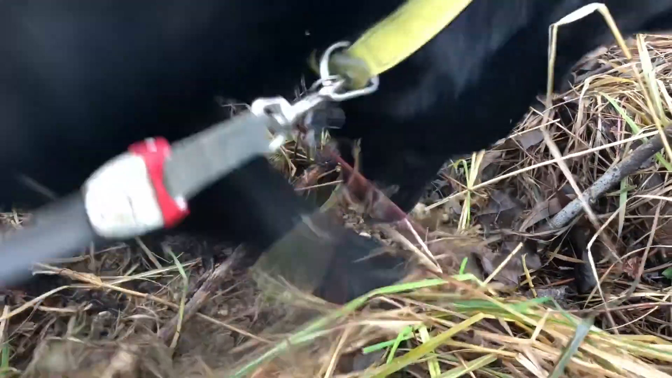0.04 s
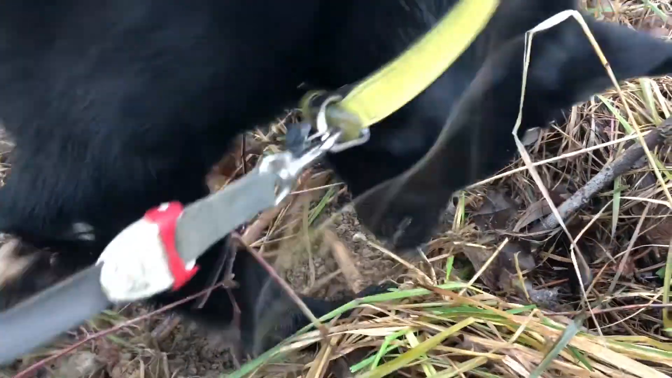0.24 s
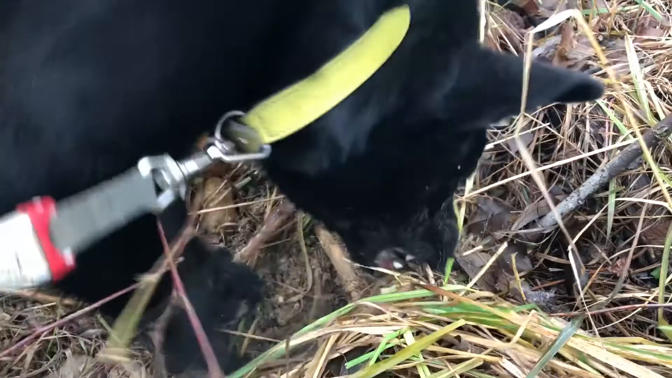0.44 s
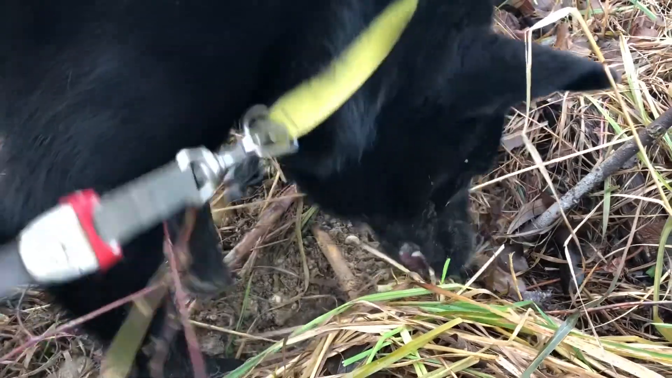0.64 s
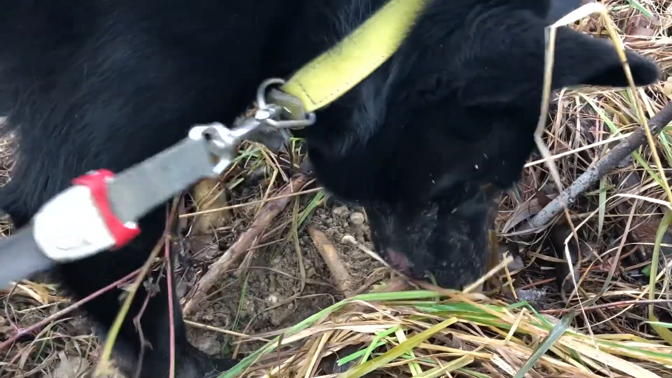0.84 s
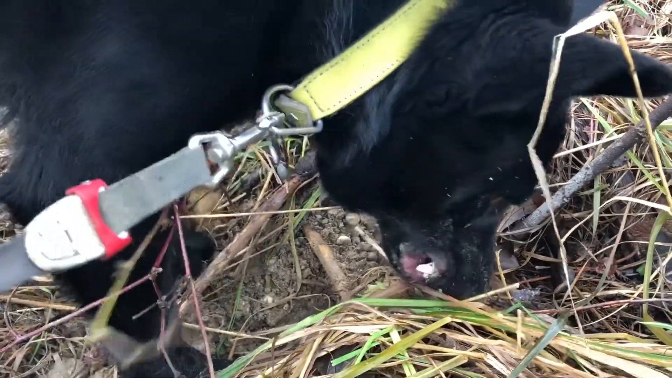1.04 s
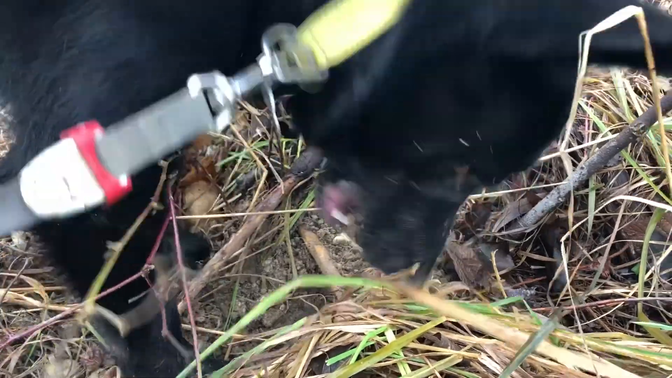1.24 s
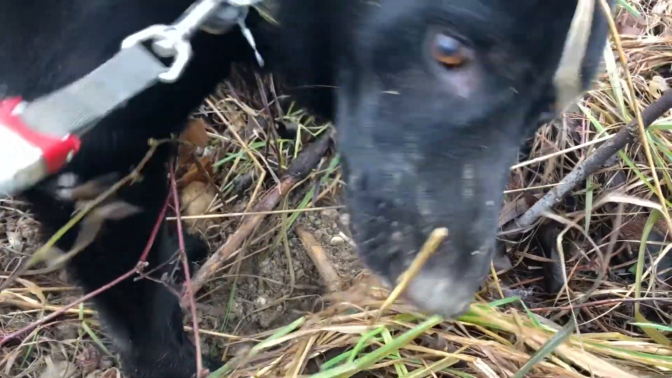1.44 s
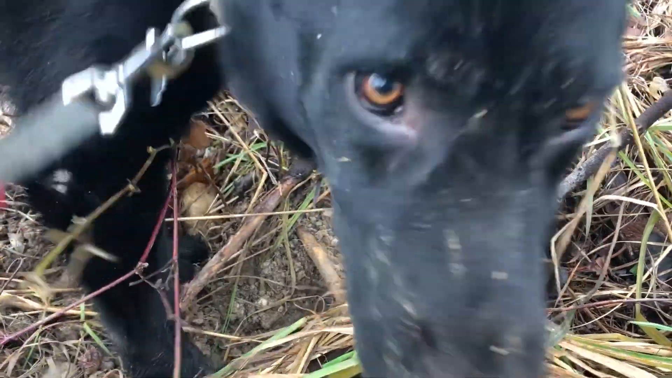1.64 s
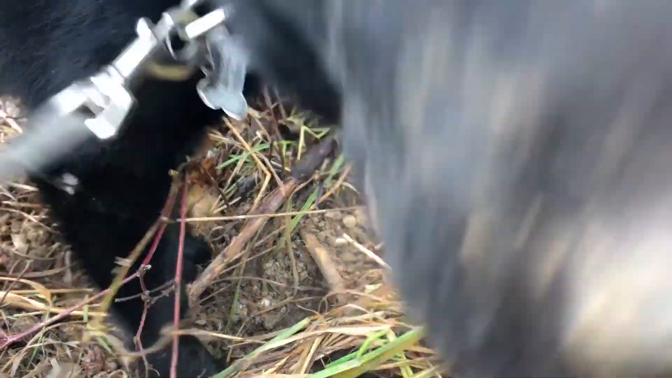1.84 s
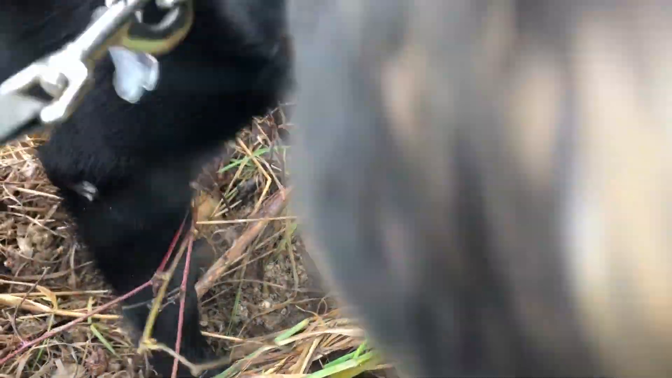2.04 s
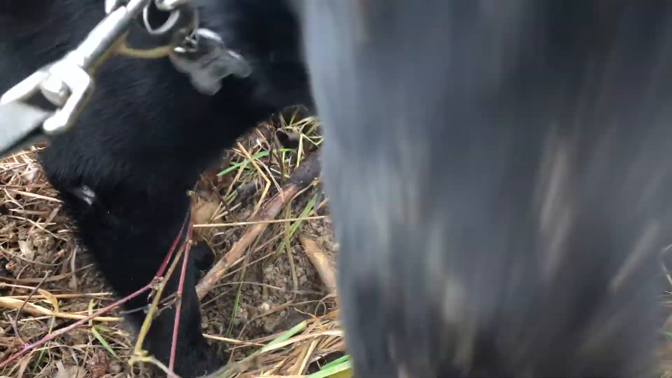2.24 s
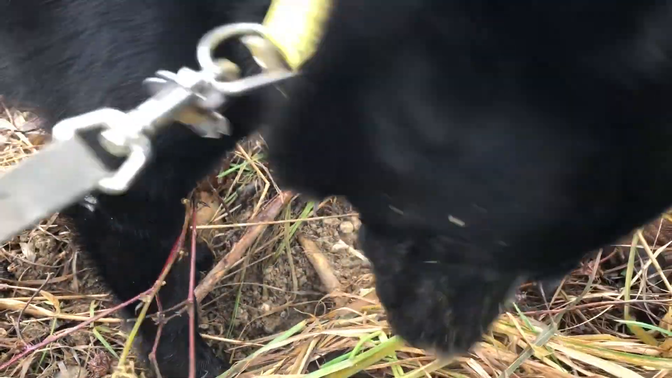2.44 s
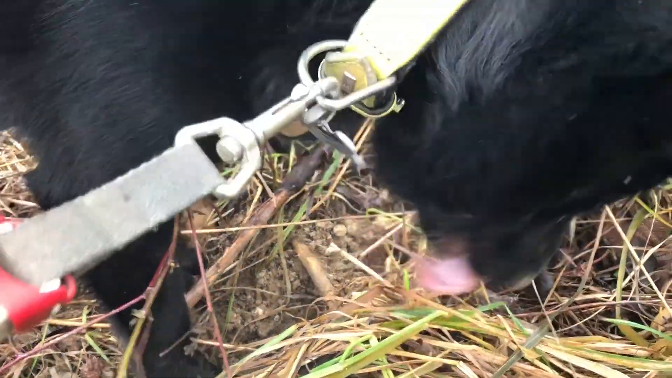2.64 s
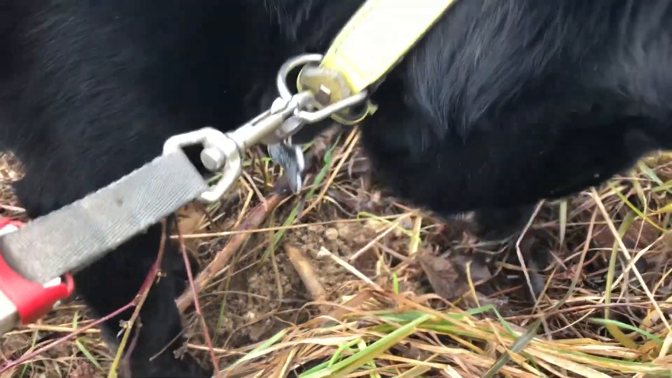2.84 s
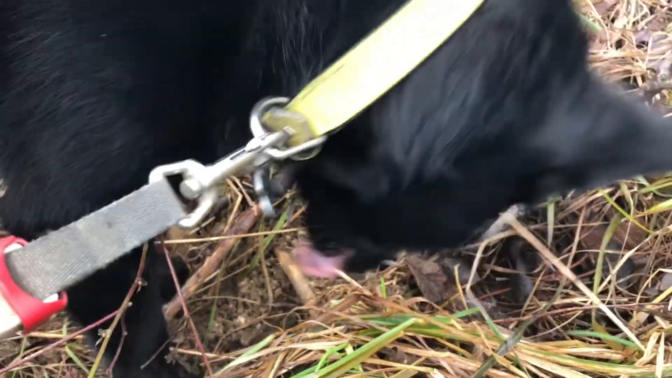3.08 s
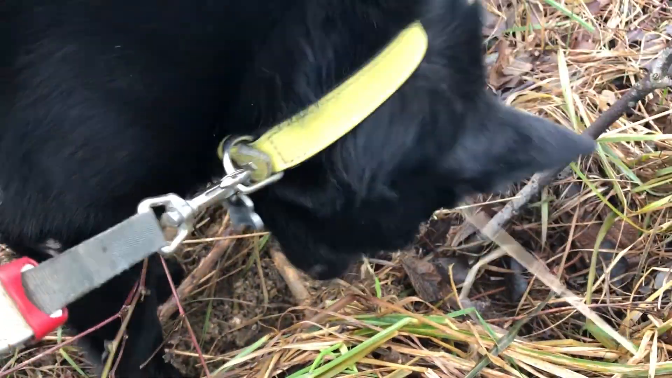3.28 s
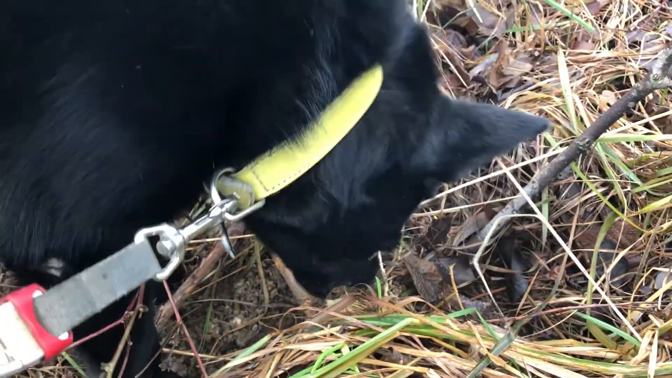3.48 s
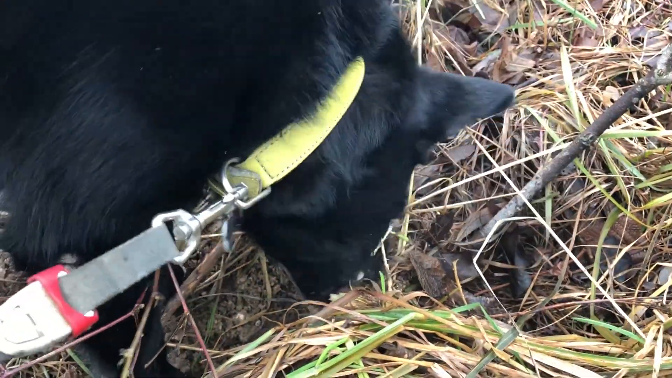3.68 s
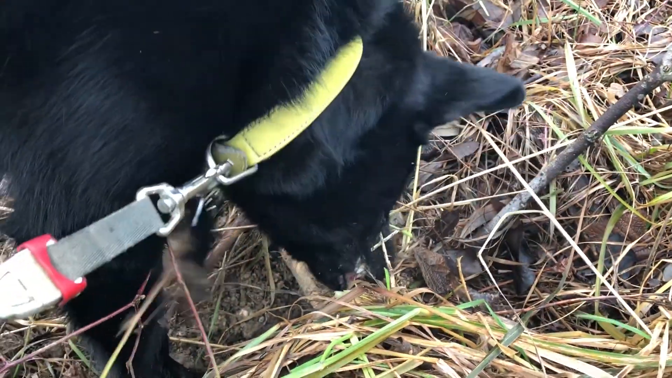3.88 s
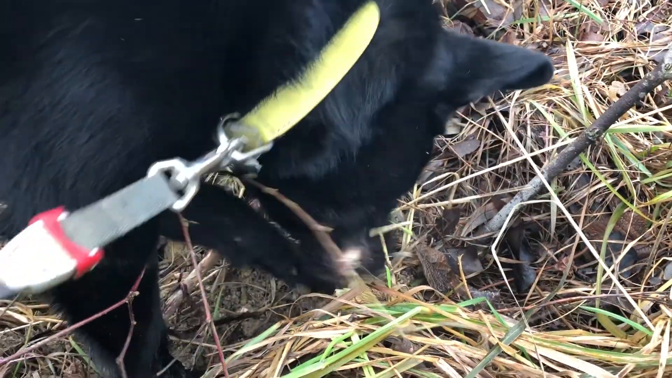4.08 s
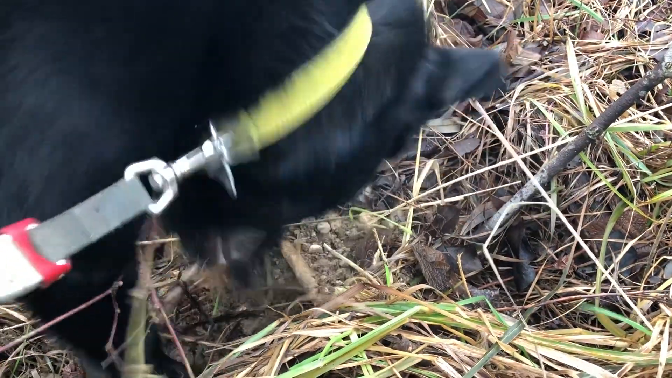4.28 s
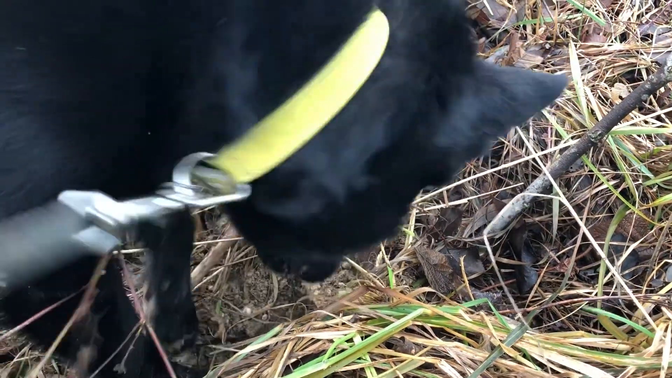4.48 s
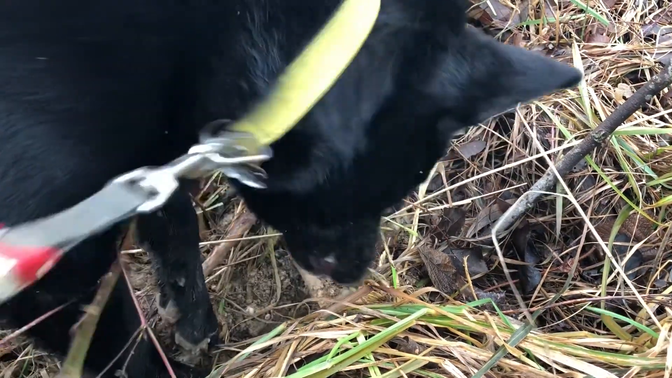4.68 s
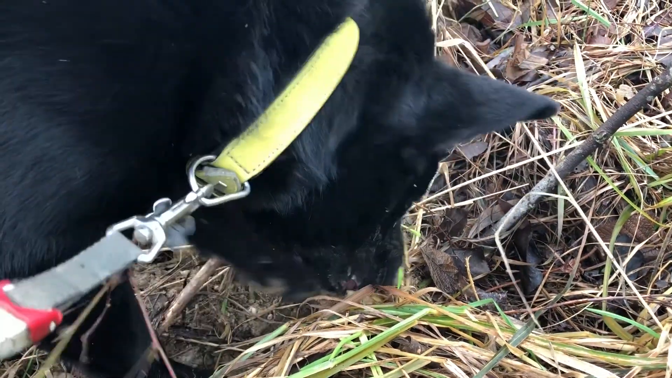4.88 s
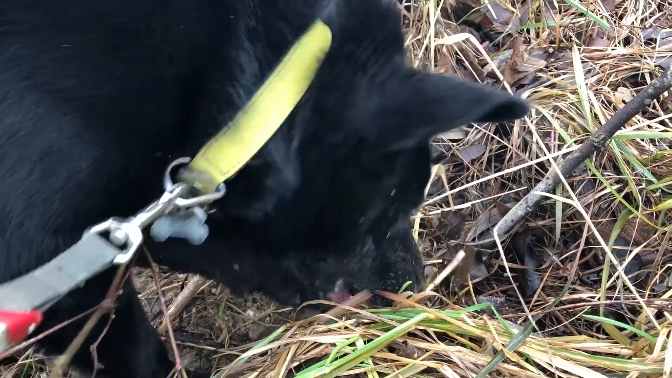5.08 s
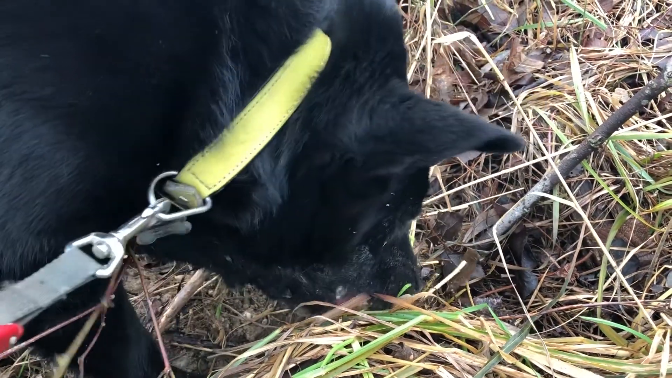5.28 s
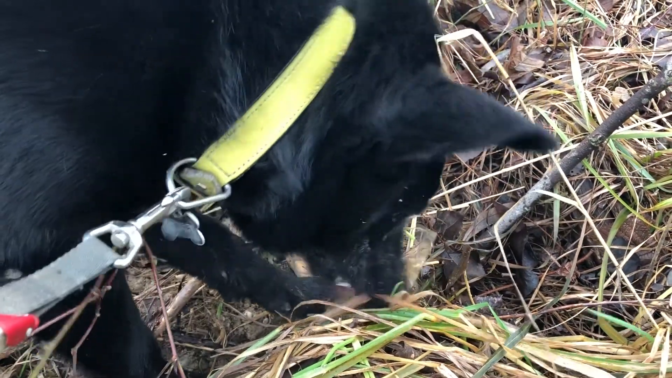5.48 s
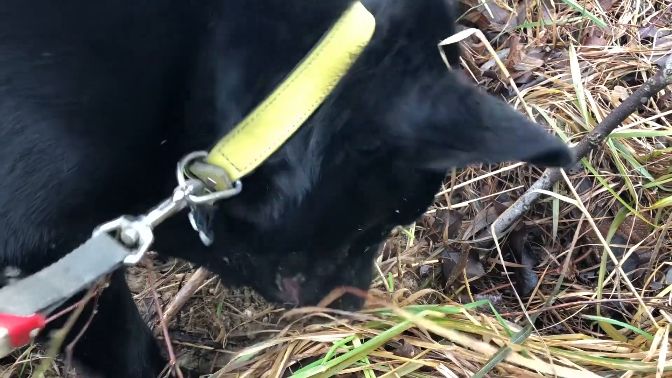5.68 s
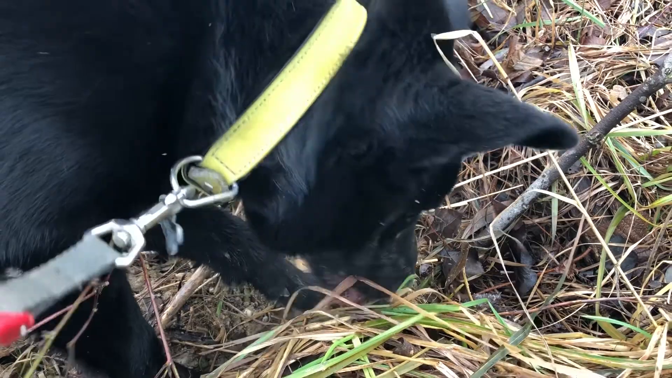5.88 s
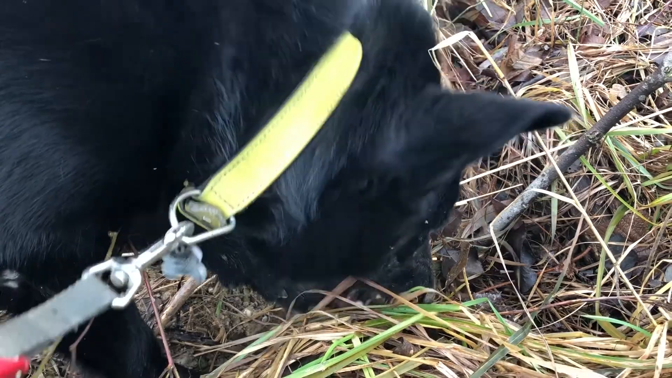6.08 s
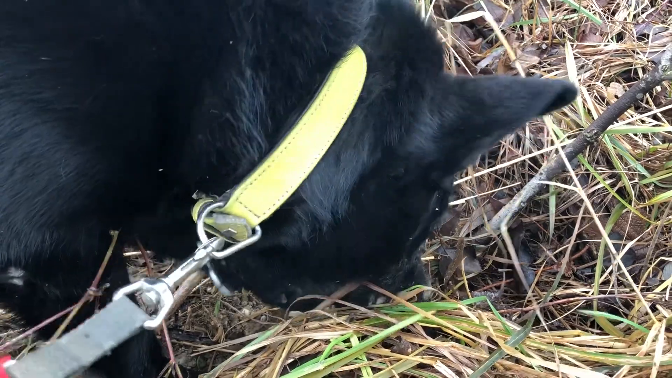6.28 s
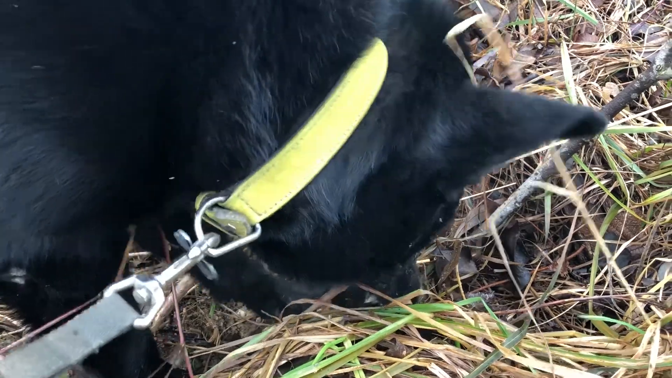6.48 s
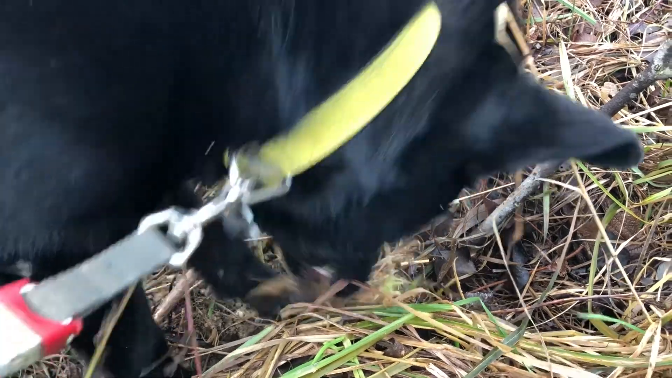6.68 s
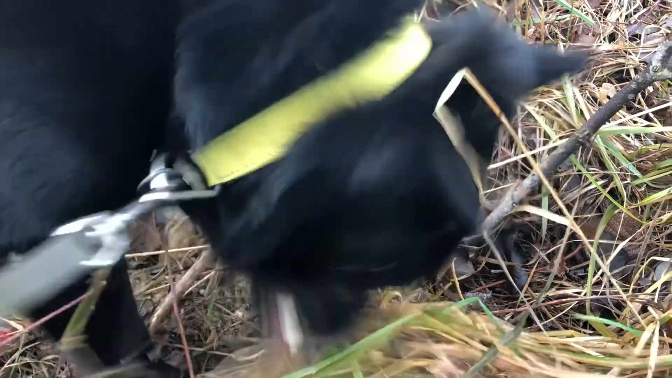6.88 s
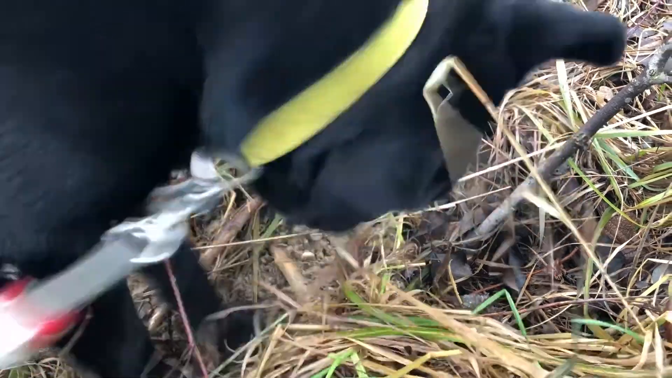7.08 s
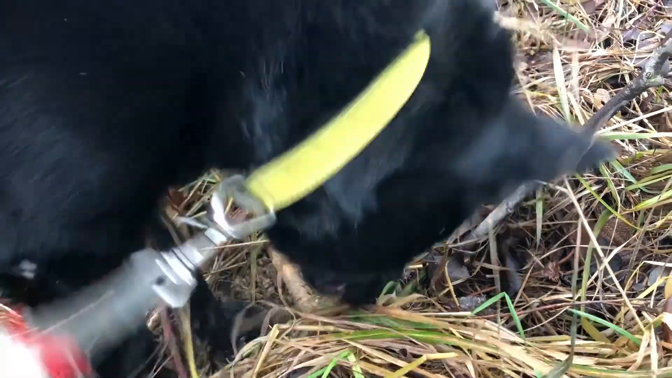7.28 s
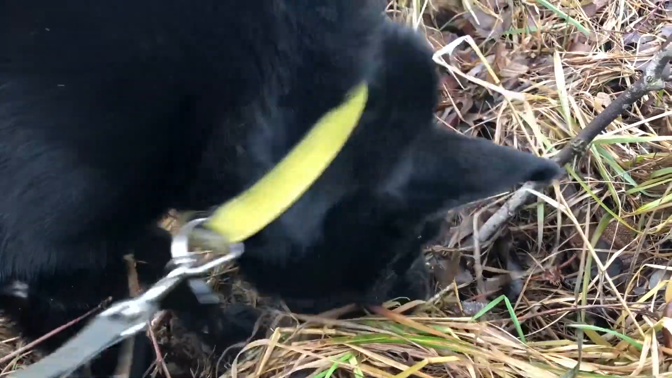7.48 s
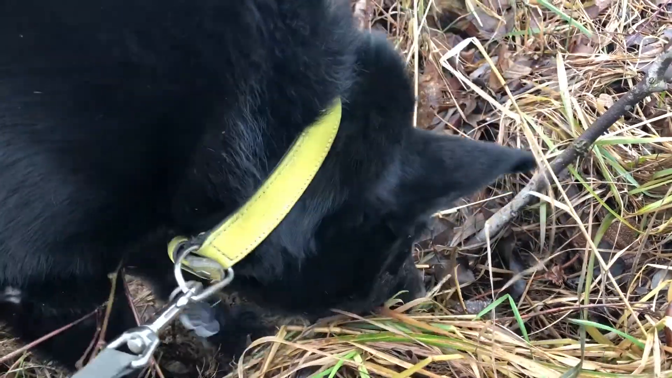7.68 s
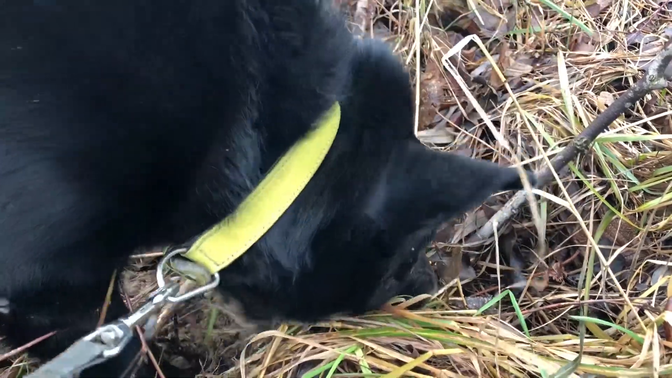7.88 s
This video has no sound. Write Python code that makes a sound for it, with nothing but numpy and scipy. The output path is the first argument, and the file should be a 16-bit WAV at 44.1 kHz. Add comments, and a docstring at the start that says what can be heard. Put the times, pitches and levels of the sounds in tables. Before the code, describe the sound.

Close up outdoors, a dog scrapes gritty soil and dry grass while small steel leash parts clink brightly. Dry stalks snap and soft thuds land early on; then roots crack in its mouth with hollow knocks. A thick jingle follows midway, then quieter scratching, a tight cluster of loud root snaps, and the fullest jingling and rattling before the litter settles. A faint low rumble and distant rush lie beneath.

```python
"""A low outdoor rumble and a faint far rush, both filtered noise, lie under a dog digging in dry litter.
In the first two seconds steel clinks (damped modes), scraped soil (crackle, tiny pitched grits) and dry snaps
mix, with thuds of dull noise; roots then snap (noise cracks, hollow mouth knocks) in groups up to 4.2 s.
The leash hook, collar ring and tag jingle thickly from 4.1 to 5.1 s; the densest root snaps come at 6.6 s.
The fullest jingling and rattling follows from 6.7 to 7.5 s, then the litter stirs on to the end."""
import sys
import numpy as np
from scipy import signal
from scipy.fft import rfft, irfft, next_fast_len
from scipy.io import wavfile
from scipy.ndimage import map_coordinates

SR = 44100
rng = np.random.default_rng(int(sys.argv[2]) if len(sys.argv) > 2 else 0)


def store_wav(level_fs):
    """Save 16-bit WAV to argv[1]."""
    pcm = np.round(np.clip(np.atleast_2d(level_fs), -1, 1) * 32767)
    wavfile.write(sys.argv[1], SR, pcm.T.astype(np.int16))


N = 349713
AGE = np.arange(SR // 8) / SR  # time since a contact [s]
BAND_LIMIT_HZ = 15950

# Table levels and decays are starting points: the functions trim and scatter them.
# far rumble over time: (time [s], level [dB])
RUMBLE_LEVEL = [(0, -43.5), (2.7, -43.5), (3.6, -44.5), (7.93, -45.5)]
# colour of the rumble: (frequency [Hz], gain [dB])
RUMBLE_COLOUR = [(20, -56), (31, -31), (42, -13.5), (60, -1), (88, -0.5), (125, -2), (170, -5.5),
                 (250, -12.5), (400, -23), (700, -41.5), (1500, -70)]
# far rush over time: (time [s], level [dB])
RUSH_LEVEL = [(0, -55.5), (3.7, -55), (4.3, -56.5), (7.93, -57)]
# colour of the rush: (frequency [Hz], gain [dB])
RUSH_COLOUR = [(150, -10), (350, -1.5), (500, -3.5), (680, -3), (820, 0.5), (1050, 1), (1600, -3.5),
               (2500, -13), (3300, -19.5), (6000, -32)]

# the dog's shifting weight stirs the litter between strokes: (time [s], soil level [dB])
STIR = [(0, -67), (1.4, -68.5), (1.7, -72), (2.5, -72), (3.0, -73), (3.4, -78.5), (3.65, -71), (4.7, -69),
        (5.25, -75), (5.8, -69), (6.05, -80), (6.3, -73.5), (7.3, -67), (7.6, -75.5), (7.93, -70.5)]
# strokes of paw or muzzle through the litter:
# (start [s], length [s], soil scrape level [dB], dry grass against the soil [dB])
STROKES = [(0, .025, -54.5, -0.5), (0.068, 0.04, -45.5, -10.5), (0.168, .1, -51, -6),
           (.3, 0.25, -56.5, -6.5), (0.486, 0.025, -50.5, -4.5), (0.725, 0.14, -67, -11),
           (0.965, 0.05, -61.5, -5), (1.143, 0.16, -59.5, -16), (1.31, .13, -64.5, -7.5),
           (1.883, 0.21, -60, -20), (2.154, 0.12, -59.5, -29), (3.182, .05, -72, -1),
           (3.899, 0.3, -67, -12), (4.308, .19, -61, -7), (4.62, 0.13, -71, -11), (5.343, .34, -60.5, -7.5),
           (5.502, 0.051, -53, -2), (5.81, 0.077, -66.5, -4.5), (6.383, 0.56, -67, -10),
           (6.631, 0.062, -52.5, -18), (6.73, .2, -63, -15), (6.937, 0.09, -51, -0.5),
           (7.07, 0.081, -53, -1), (7.25, 0.23, -65.5, -17)]
# colour of scraped soil: (frequency [Hz], gain [dB])
SOIL_COLOUR = [(200, -10), (700, 2), (1800, -13), (3200, -3.5), (5500, -4.5), (8000, -9), (12000, -15)]
# colour of dragged dry blades: (frequency [Hz], gain [dB])
GRASS_COLOUR = [(2000, -38), (5000, -2.5), (8000, -1), (12000, -0.5), (15500, -6.5)]
STIR_GRASS_DB = -10  # dry grass against the soil in the stir
CLUMP_DB = 2.1  # the litter gives way in uneven clumps
# the claw bites in; the loosened litter settles (time constant)
STROKE_ATTACK_S, STROKE_RELEASE_S = 0.018, 0.038

# paws and muzzle thumping the soil: (time [s], level [dB])
THUDS = [(0.111, -45), (.452, -43), (.535, -37.5), (2.096, -36.5), (2.107, -35), (6.705, -40)]
# dull colour of the thuds: (frequency [Hz], gain [dB])
THUD_COLOUR = [(40, -9), (120, 2.0), (300, -4), (600, -6.0), (1100, -18), (4000, -38)]
# short pitched cracks and knocks, some together with the steel clinks: (time [s], level [dB], pitch [Hz])
PITCHED_CRACKS = [(.111, -35, 1760), (.12, -48, 2840), (0.26, -37, 3460), (0.45, -34.5, 1060),
                  (0.512, -35.5, 3350), (.52, -39, 2070), (1.051, -37.5, 6100), (1.321, -41, 4000),
                  (1.856, -39, 990), (2.273, -30, 3400), (2.602, -37, 1050), (3.086, -45, 3350),
                  (4.76, -38, 1510), (4.981, -45.5, 2400), (4.99, -34.5, 4300), (6.546, -25.5, 2950),
                  (6.691, -27, 2870), (7.243, -37, 2430)]
# dry stalks breaking: (time [s], peak level [dB], lower band against the treble [dB])
STALKS = [(.1732, -27.5, -7.5), (0.2593, -34, -15), (0.4863, -31, -8), (.4992, -19.5, -23.5),
          (.9212, -38, -17), (0.9864, -31, -28), (1.0066, -32.5, -22), (1.1096, -21.5, -25),
          (1.1703, -27, -24), (1.18, -25.5, -20), (1.2068, -28.5, -31.5), (1.297, -33.5, -22),
          (1.5311, -36.5, -20), (1.781, -40, -13.5), (2.0809, -38.5, -18), (2.2344, -39, -11),
          (2.252, -37.5, -10), (2.7112, -41, -18), (3.0728, -41.5, -1), (3.244, -43.5, -10),
          (4.309, -39, -8), (4.625, -36.5, -6), (5.334, -36, -15.5), (5.4243, -35, -15),
          (5.511, -31.5, -12), (5.526, -30, -20), (6.232, -40.5, -3), (6.9695, -25.5, -24.5)]

# roots snapping in the teeth: (time [s], crack level [dB], hollow knock level [dB], mouth resonance [Hz])
BITES = [(.540, -42.5, -61, 490), (2.196, -40.5, -39, 800), (2.274, -36.5, -29.5, 640),
         (2.690, -39.5, -42.5, 758), (3.682, -66, -38, 880), (4.042, -24.5, -30.5, 827),
         (4.15, -19, -33, 840), (5.847, -57.5, -33.5, 780), (6.5456, -17.5, -35, 673),
         (6.606, -24, -32.5, 770), (6.6133, -24, -34, 714), (6.665, -20.5, -42, 770),
         (6.678, -22, -36, 740), (6.692, -17, -25.5, 672), (6.706, -25, -33, 730)]
# colour of the cracking root: (frequency [Hz], gain [dB])
CRACK_COLOUR = [(300, -20), (1000, -6), (2000, -2.0), (2800, -6.5), (5500, 7.5),
                (8000, 1.5), (11000, -6.0), (16000, -4.5)]

# the tag strikes the hook: (time [s], ring level [dB], tick level [dB], spot [0 face to 1 rim],
# decay t60 [s], share of the upper twin [0-1])
CLINKS = [(.076, -28.5, -45.5, .75, 0.1, 0.3), (.107, -28, -30.5, 0.85, 0.062, 0.3),
          (0.374, -26.5, -35, 0.67, 0.13, 0.4), (0.421, -30, -54, .05, 0.051, .5),
          (0.567, -52, -44, .55, .06, .1), (.705, -50.5, -48, .4, .07, .6),
          (.832, -29, -35, 0.68, .1, 0.97), (1.051, -35.5, -48, 0.28, 0.12, .1),
          (1.478, -52.5, -49.5, .65, 0.1, .7), (1.631, -47.5, -46, 0.68, 0.099, 0.4),
          (1.91, -63, -52, .42, 0.28, .9), (2.641, -23, -36, 0.41, 0.065, 0.14),
          (2.652, -40, -45, .45, 0.11, 0), (3.122, -51, -58, .1, .05, .3),
          (3.386, -32, -39, .02, 0.061, .4), (4.1, -29.5, -31.5, 0.2, 0.048, 0.8),
          (4.346, -38, -41, 0.46, .09, .9), (4.371, -42, -39, 0.89, .25, .1),
          (4.42, -34, -35, 1, 0.065, 0.4), (4.439, -26, -33, .78, 0.066, 0.9),
          (4.4624, -17.5, -28.5, 0.24, 0.012, .7), (4.644, -47, -40.5, 0.9, 0.079, .2),
          (4.677, -49, -52, .45, 0.086, .7), (4.687, -21.5, -28.5, .03, 0.072, .7),
          (4.758, -27, -29.5, 0.55, 0.076, 0.4), (4.824, -42.5, -43.5, 0.62, 0.1, 0.6),
          (4.903, -48.5, -35.5, 1, 0.075, .7), (4.98, -46.5, -27.5, 0.68, 0.099, .75),
          (5.046, -41.5, -34.5, .45, 0.11, .3), (6.106, -36, -40.5, 0.18, 0.074, .1),
          (6.408, -47.5, -56, 0.52, 0.064, .9), (6.697, -31, -30, 0.32, .1, 0.7),
          (6.842, -27.5, -30, 0.87, 0.055, .6), (6.872, -25.5, -37, 0.71, 0.084, .85),
          (6.882, -35, -30.5, .6, .056, 0.6), (6.908, -44, -30.5, 0.85, 0.14, .1),
          (6.977, -26, -34.5, 0.73, 0.083, .9), (7.083, -23.5, -17, .5, 0.11, .9),
          (7.096, -20, -19.5, 0.65, .078, .6), (7.107, -25.5, -22.5, 0.34, .08, 0),
          (7.119, -20.5, -31.5, .03, .075, .1), (7.131, -21, -25.5, 0.75, 0.09, .05),
          (7.178, -38, -34, 0.35, 0.12, .2), (7.197, -21, -20, 0.79, .06, 0.9),
          (7.208, -27.5, -28.5, 0.69, 0.081, 1), (7.2425, -20.5, -21, 0.13, .028, 0),
          (7.3238, -33, -32, 0.89, .07, .9), (7.389, -33, -44.5, 1, 0.13, .4),
          (7.3965, -33, -25.5, .35, .083, .7), (7.409, -29.5, -39, .4, 0.095, .05),
          (7.42, -16, -39.5, 0.3, 0.077, .06), (7.442, -23, -29, 0.76, 0.084, 0),
          (7.687, -30.5, -38, 0.13, 0.035, .3)]
# the hook chatters along the collar ring as the leash shifts: (start [s], length [s], tick level [dB])
RATTLES = [(0.045, .04, -41), (.296, .012, -40), (4.195, .055, -44.5), (4.386, .05, -40), (4.486, .02, -49),
           (7.064, .012, -29.5), (7.09, .055, -26), (7.328, .01, -42.5), (7.394, .02, -33.5),
           (7.608, .02, -52)]
# four families of hardware modes: (frequency [Hz], level [dB], t60 as a share of the contact's [ratio])
BODY_MODES = [(3220, -22, 0.8), (3666, -4, 0.61), (8050, 1, 0.35), (8140, 0.5, 0.68)]
TWIN_MODES = [(9751, 0, 1.2), (9950, 0, 1.1)]
MAIN_MODES = [(11672, 0, 1), (11740, -12, .5)]
TOP_MODES = [(14692, -1, .9), (14933, -11, .8)]
# the face rings the main mode, the rim the top mode and the body:
# (spot [0 face to 1 rim], body level [dB], twins level [dB], main level [dB], top level [dB])
SPOT_MIX = [(0, -30, -13.5, 2, -31), (.33, -22.5, -1, 0.5, -16), (.67, -16, 0.5, 2, -1.5),
            (1, -7, -7.5, -13.5, 2.5)]
# the hook's gate and swivel clank with every tick: (frequency [Hz], level [dB], decay t60 [s])
SWIVEL_MODES = [(5700, -11.5, 0.036), (6440, -10.5, .04), (6800, -10, .04), (7540, -4.5, 0.033),
                (10300, -3, 0.054), (10600, -5, 0.064), (10500, -11.5, .05), (11400, -4, .04)]
# colour of steel on steel: (frequency [Hz], gain [dB])
TICK_COLOUR = [(300, -34.5), (1500, -15), (3000, -11), (4200, 1), (6500, 7), (9000, -0.5), (11000, -11),
               (13000, 3), (16000, 0.5)]
SPOT_SCATTER_DB = 0.46  # scatter of each mode family from contact to contact
CLINK_BODY_DB = -18.5  # the tick alone wakes the body modes this much
RATTLE_GAP_S = 0.014  # mean time between rattle contacts
RATTLE_BODY_DB, RATTLE_TAG_DB = -7, -15  # against the tick
RATTLE_T60_S, RATTLE_SPOT = 0.095, 0.65  # near the rim
SETTLE_S = 0.08  # the tag swings back against the fur, which chokes its ring ever faster


def amp(db):
    """Decibels to a linear gain."""
    return 10 ** (np.asarray(db) / 20)


def unit(x):
    """x scaled to rms 1."""
    return x / np.sqrt(np.mean(x ** 2) + 1e-20)


def curve(rows):
    """One value per sample, in straight lines between (time [s], value) points."""
    s, values = np.transpose(rows)
    return np.interp(np.arange(N) / SR, s, values)


def wobble(rate):
    """A smooth random curve, rate knots a second."""
    knots = rng.standard_normal(int(N * rate / SR) + 4)
    return map_coordinates(knots, [np.arange(N) * rate / SR])


def coloured(x, points):
    """x through a causal minimum-phase filter with the gain of the (Hz, dB) points."""
    size = 2 * next_fast_len(len(x))
    hz, db = np.transpose(points)
    gain_db = np.interp(np.log(np.fft.rfftfreq(size, 1 / SR) + 1), np.log(hz), db)
    # folding the cepstrum forward in time makes the filter causal
    cepstrum = irfft(np.log(amp(gain_db)))
    cepstrum[1:size // 2] *= 2
    cepstrum[size // 2 + 1:] = 0
    return irfft(rfft(x, size) * np.exp(rfft(cepstrum)))[:len(x)]


def add(track, s, sound):
    """Lay a sound into the track at time s."""
    part = track[max(round(s * SR), 0):][:len(sound)]
    part += sound[:len(part)]


def fade(t60):
    """A decay over AGE that loses 60 dB in t60 seconds."""
    return amp(-60 * AGE / max(t60, 1e-4))


def burst(t60):
    """Noise that dies away."""
    return rng.standard_normal(len(AGE)) * fade(t60)


def ring(hz, t60):
    """One damped mode, starting at a random phase."""
    return np.sin(2 * np.pi * (hz * AGE + rng.random())) * fade(t60)


def surroundings(rush_trim_db=1):
    """A far rumble under a faint rush: two coloured noises whose levels drift a little."""
    rumble = unit(coloured(rng.standard_normal(N), RUMBLE_COLOUR))
    rush = unit(coloured(rng.standard_normal(N), RUSH_COLOUR))
    rush_db = curve(RUSH_LEVEL) + rush_trim_db + 0.67 * wobble(30)
    return amp(curve(RUMBLE_LEVEL)) * rumble + amp(rush_db) * rush


def effort():
    """Gains of soil and grass: each stroke rises, holds and dies away over the faint stir."""
    stir_db = curve(STIR)
    soil_power = amp(stir_db) ** 2
    grass_power = amp(stir_db + STIR_GRASS_DB) ** 2
    t = np.arange(SR) / SR
    for s, length, db, grass_db in STROKES:
        attack = np.minimum(t / STROKE_ATTACK_S, 1)
        shape = attack * np.exp(-np.maximum(t - length, 0) / STROKE_RELEASE_S)
        add(soil_power, s, (amp(db) * shape) ** 2)
        add(grass_power, s, (amp(db + grass_db) * shape) ** 2)
    return np.sqrt(soil_power), np.sqrt(grass_power)


def crackle(rate, spread_db, smooth):
    """Tiny fractures of unequal size, rate a second, over smooth friction noise, rms 1."""
    sizes = amp(spread_db * np.minimum(rng.exponential(size=N), 4))
    fractures = (rng.random(N) < rate / SR) * sizes
    envelope = signal.fftconvolve(fractures, fade(0.0022))[:N]
    grains = unit(envelope * rng.standard_normal(N))
    return unit(grains + smooth * rng.standard_normal(N))


def grit(count=2600, centre_hz=4800, spread_db=3, cycles=16):
    """Crumbs of soil and leaf, each a short sine with its own pitch and size, rms 1."""
    place = rng.random(count)
    pitch = rng.standard_normal(count)
    size = rng.exponential(size=count)
    hz = np.clip(centre_hz * np.exp(0.6 * pitch), 1000, 14000)[:, None]
    t = AGE[:SR // 50]
    # every crumb loses 60 dB in the same number of cycles
    level_db = spread_db * np.minimum(size, 2)[:, None] - 60 * t * hz / cycles
    grains = amp(level_db) * np.sin(2 * np.pi * hz * t)
    where = (place * N).astype(int)[:, None] + np.arange(len(t))
    return unit(np.bincount(where.ravel(), grains.ravel(), N)[:N])


def digging(soil_db=-1, grass_db=5, grit_db=-4, crumbs_db=-6):
    """Claws scrape gritty soil, crush coarser crumbs and drag dry blades over each other, in clumps."""
    scrape, rustle = effort()
    clumps = amp(CLUMP_DB * wobble(80))
    soil = unit(coloured(crackle(rate=850, spread_db=0.5, smooth=1.0), SOIL_COLOUR))
    grass = unit(coloured(crackle(rate=310, spread_db=2.5, smooth=0.89), GRASS_COLOUR))
    crumbs = grit(count=900, centre_hz=4530, spread_db=4.5, cycles=9)
    ground = amp(soil_db) * soil + amp(grit_db) * grit() + amp(crumbs_db) * crumbs
    return clumps * (scrape * ground + rustle * amp(grass_db) * grass)


def thuds(trim_db=19.5):
    """Soft pushes into the soil: dull noise with a softened onset."""
    out = np.zeros(N)
    for s, db in THUDS:
        add(out, s, amp(db + trim_db) * burst(0.082) * (1 - fade(0.017)))
    return coloured(out, THUD_COLOUR)


def pitched_crack(hz, t60):
    """Four short damped modes scattered around one pitch."""
    return sum(ring(hz * np.exp(0.12 * rng.standard_normal()), t60) for _ in range(4)) / 2


def pitched_cracks(trim_db=1, t60=0.016):
    """Short pitched cracks and knocks, some of them together with the steel clinks."""
    out = np.zeros(N)
    for s, db, hz in PITCHED_CRACKS:
        add(out, s, amp(db + trim_db) * pitched_crack(hz, t60) * (1 - fade(0.00099)))
    return out


def stalks():
    """Dry stalks snap as short noise, brighter or fuller by the level of the lower band."""
    out = np.zeros(N)
    for s, peak_db, low_db in STALKS:
        colour = [(500, -26.0), (2000, low_db + 0.5), (4000, low_db + 7), (8000, -8.5), (15000, -6.5)]
        snap = coloured(burst(0.0082) + amp(0.5) * burst(0.028), colour)
        add(out, s, amp(peak_db) * snap / np.abs(snap).max())
    return out


def bites(crumble_db=-13, knock_db=2, wood_db=-12):
    """A root parts with a sharp crack and crumbles; the half-closed mouth answers with a hollow knock."""
    cracks, knocks = np.zeros(N), np.zeros(N)
    for s, db, hollow_db, mouth_hz in BITES:
        # fibres part one after another
        fibres = np.abs(np.sin(2 * np.pi * rng.uniform(70, 109) * AGE)) ** 3
        crumble = burst(0.028) * fibres
        add(cracks, s, amp(db) * (burst(0.0034) + amp(crumble_db) * crumble))
        mouth = ring(mouth_hz, 0.031) + amp(-5.0) * ring(mouth_hz * 0.87, 0.0094)
        add(knocks, s, amp(hollow_db + knock_db) * mouth * (1 - fade(0.0076)))
        add(knocks, s, amp(db + wood_db) * pitched_crack(2960, 0.0073))
    return knocks + coloured(cracks, CRACK_COLOUR)


def contacts():
    """Single clinks and runs of rattling, as (s, body dB, ring dB, tick dB, spot, t60, upper share)."""
    rows = []
    for s, ring_db, tick_db, spot, t60, upper in CLINKS:
        rows.append((s, tick_db + CLINK_BODY_DB, ring_db, tick_db, spot, t60, upper))
    for start, length, db in RATTLES:
        gaps = RATTLE_GAP_S * rng.uniform(0.5, 1.5, size=12)
        delays = np.cumsum(gaps) - gaps[0]
        ticks_db = db + 2 * rng.standard_normal(len(gaps))
        for delay, tick_db, upper in zip(delays, ticks_db, rng.random(len(gaps))):
            if delay < length:
                rows.append((start + delay, tick_db + RATTLE_BODY_DB, tick_db + RATTLE_TAG_DB,
                             tick_db, RATTLE_SPOT, RATTLE_T60_S, upper))
    return rows


def mode_mix(spot, ring_db, jolt_db, upper):
    """The level of each mode family for a blow on this spot; the tick's jolt also reaches the body."""
    spots, *levels = np.transpose(SPOT_MIX)
    body_db, twin_db, main_db, top_db = [ring_db + np.interp(spot, spots, level) for level in levels]
    upper = np.clip(upper, 0.03, 0.97)
    return [(BODY_MODES, max(body_db, jolt_db)),
            (TWIN_MODES[:1], twin_db + 10 * np.log10(1 - upper)),
            (TWIN_MODES[1:], twin_db + 10 * np.log10(upper)),
            (MAIN_MODES, main_db), (TOP_MODES, top_db)]


def hardware(ring_trim_db=1.0, pressed_db=-4, tick_trim_db=-2, swivel_db=-13, chatter_db=-9):
    """Each steel contact wakes the modes in a mix set by its spot; touching parts damp them."""
    rings, ticks = np.zeros(N), np.zeros(N)
    choke = np.exp(-(AGE / SETTLE_S) ** 3)
    for s, jolt_db, ring_db, tick_db, spot, t60, upper in contacts():
        for modes, family_db in mode_mix(spot, ring_db, jolt_db, upper):
            family_db = family_db + SPOT_SCATTER_DB * rng.standard_normal()
            for hz, mode_db, life in modes:
                free_hz = hz * (1 + 0.00066 * rng.standard_normal())
                free = choke * ring(free_hz, t60 * life * rng.uniform(0.58, 1.24))
                # while the parts still press together, the mode is pulled off pitch and dies fast
                pressed = ring(hz * (1 + 0.018 * rng.standard_normal()), 0.02)
                tone = (free + amp(pressed_db) * pressed) * (1 - fade(0.0013))
                add(rings, s, amp(family_db + mode_db + ring_trim_db) * tone)
        for hz, mode_db, life_s in SWIVEL_MODES:
            clank_db = tick_db + swivel_db + mode_db + 5.6 * rng.standard_normal()
            add(rings, s, amp(clank_db) * ring(hz * (1 + 0.0033 * rng.standard_normal()), life_s))
        add(ticks, s, amp(tick_db + tick_trim_db) * (burst(0.012) + amp(-9.5) * burst(0.014)))
        # a short soft swell of noise leads into each tick
        swell = burst(0.016) * (1 - fade(0.0089))
        add(ticks, s - rng.uniform(0.0025, 0.0088), amp(tick_db - 18.5) * swell)
        # the parts graze each other three more times as they settle
        for delay in np.cumsum(rng.uniform(0.0015, 0.006, size=3)):
            graze_db = tick_db + chatter_db - 400 * delay + 3 * rng.standard_normal()
            add(ticks, s + delay, amp(graze_db) * burst(0.004))
    return rings + coloured(ticks, TICK_COLOUR)


def scene():
    """The dog in the litter and its hardware, close by, over the far surroundings."""
    return (surroundings() + digging() + thuds() + pitched_cracks() + stalks() + bites() + hardware())[None]


def record(dry):
    """Nothing is kept above the band limit."""
    size = next_fast_len(N + SR // 2)
    keep = np.fft.rfftfreq(size, 1 / SR) < BAND_LIMIT_HZ
    return irfft(rfft(dry, size) * keep, size)[..., :N]


dry = scene()
out = record(dry)
store_wav(out)
```